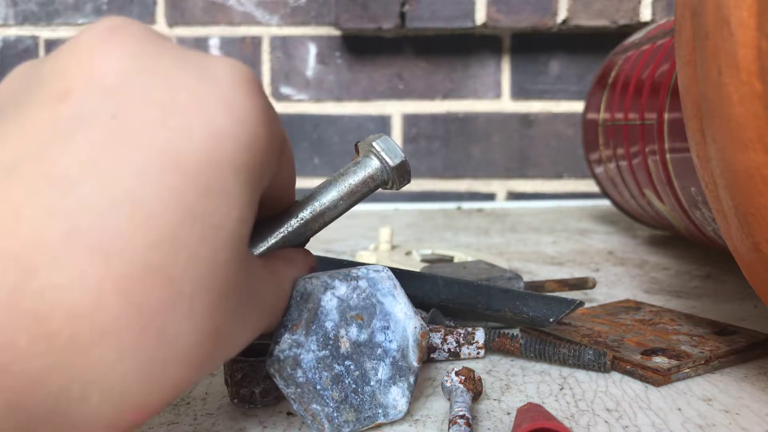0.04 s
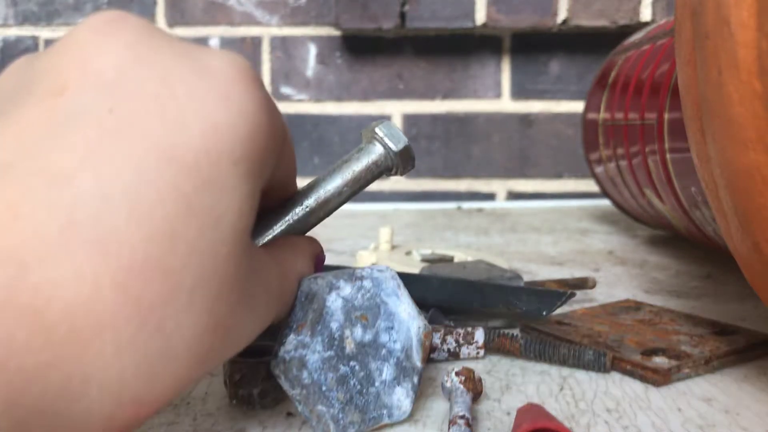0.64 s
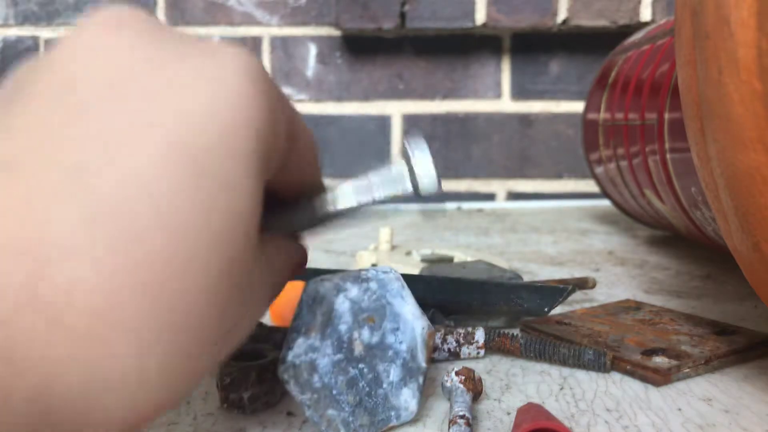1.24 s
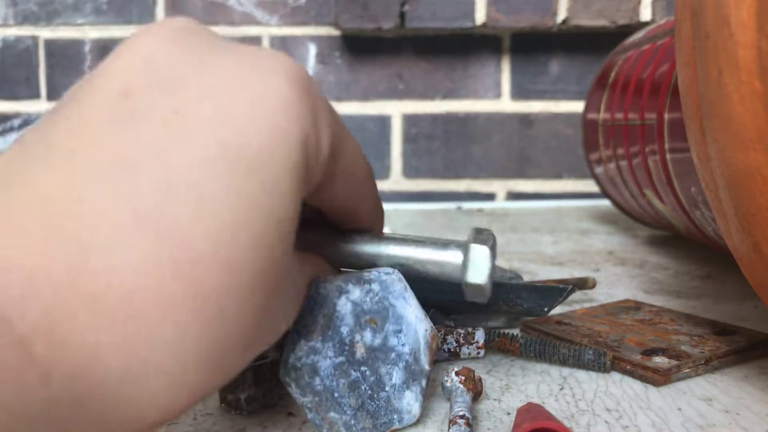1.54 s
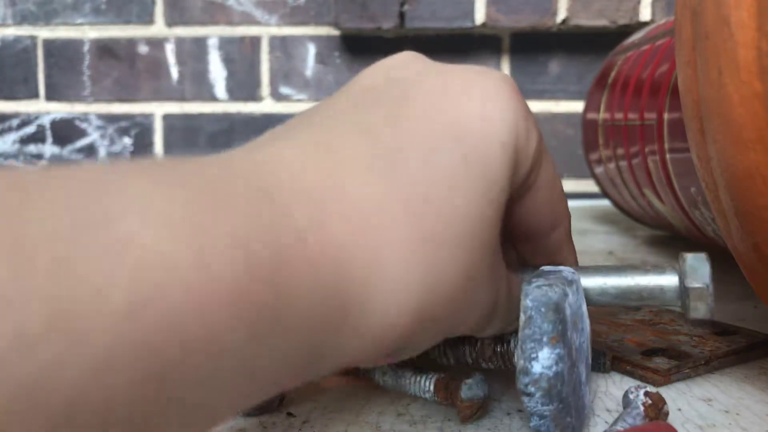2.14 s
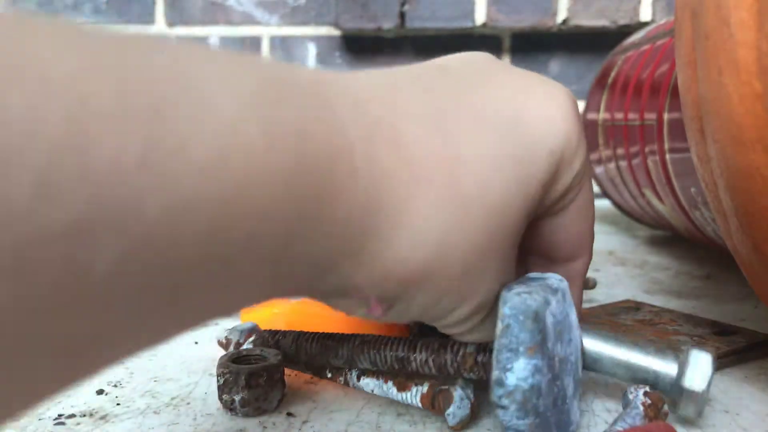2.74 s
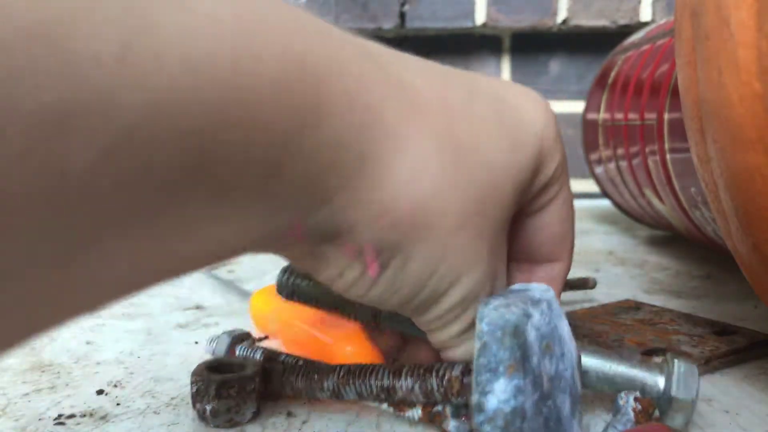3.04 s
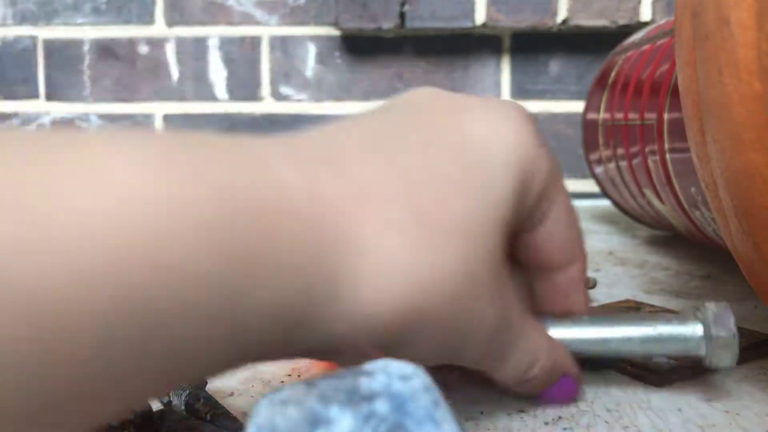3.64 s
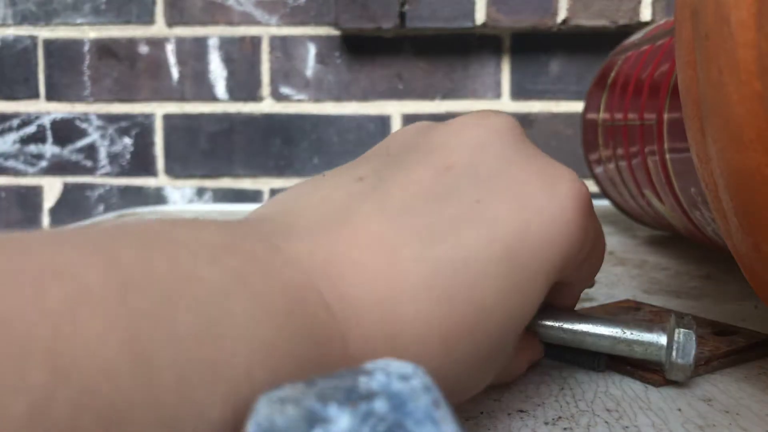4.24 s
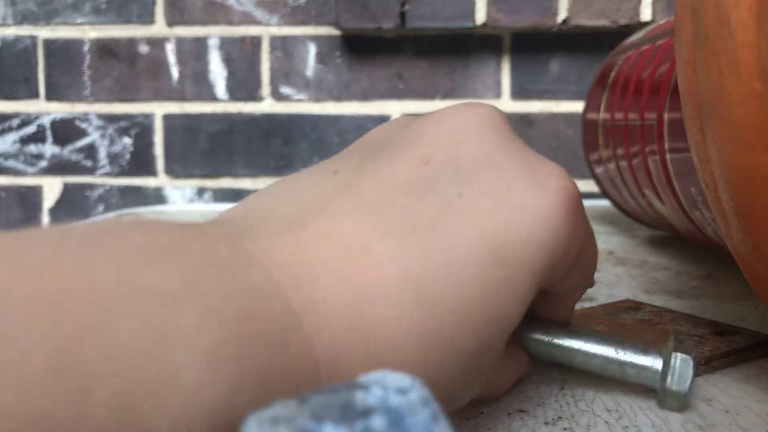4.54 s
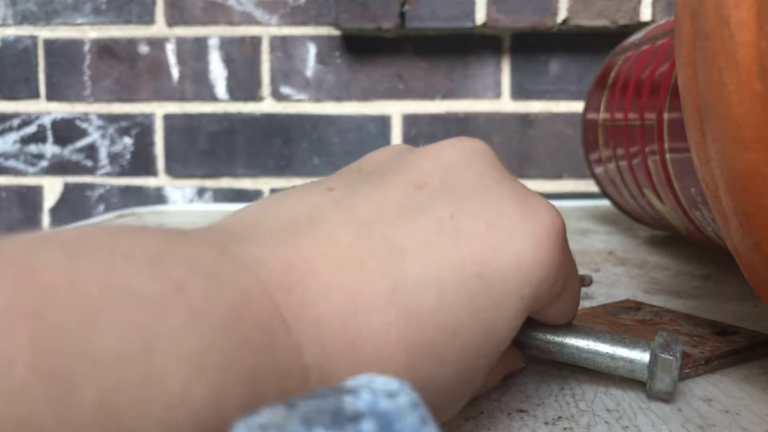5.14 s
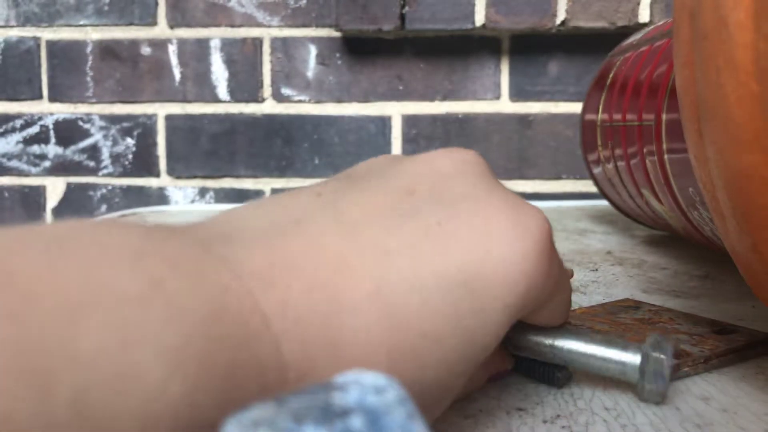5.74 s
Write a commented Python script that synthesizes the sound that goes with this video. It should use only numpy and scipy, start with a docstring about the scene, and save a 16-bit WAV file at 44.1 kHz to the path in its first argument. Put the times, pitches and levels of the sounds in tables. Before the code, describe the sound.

Steel hardware is handled on a board outdoors, very close to the microphone. From 0.3 to 0.7 seconds a piece lands with a clink and bounces in a quick run of hollow clunks. Louder knocks with brief steel rings come between 1.2 and 1.5 seconds. From 1.6 seconds a heavy bolt is dragged over the gritty surface in short, uneven pushes that rumble and rasp, with a thin metallic singing near 1.8. Scraping and scattered knocks continue, with a cluster of clinks from 3.3 to 3.8 seconds. A loud, quickly damped knock lands at 4.5, followed by lighter scrapes and taps and a bright clack at 5.6. Throughout there is soft open air, a faint low machine drone and a far insect chorus, while one nearer insect's very high, thin trill grows slightly.

```python
"""Rusty bolts and nuts clatter on a board, close by and outdoors, as a hand rummages through them.
Each impact excites the board's modes in a hollow clunk, which the hand damps; steel striking steel
rings briefly. A heavy bolt is dragged over the gritty surface, where stick-slip friction drives
the board and keeps sliding pieces singing. Behind it are soft open air, a machine's low drone,
a far chorus of insects and one nearer insect's trill."""
import sys
import numpy as np
from scipy import signal
from scipy.fft import rfft, irfft
from scipy.io import wavfile
from scipy.ndimage import uniform_filter1d

SR = 44100
rng = np.random.default_rng(int(sys.argv[2]) if len(sys.argv) > 2 else 0)


def bounce(signal):
    """Save signal as a 16-bit WAV file at the path given by the first command-line argument."""
    frames = np.transpose(np.atleast_2d(signal))
    limited = np.clip(frames, -1, 1)
    pcm = np.round(limited * 32767).astype(np.int16)
    wavfile.write(sys.argv[1], SR, pcm)


N = 263718
TIME = np.arange(N) / SR
RING_TIME = TIME[:SR // 4]

# spectrum of the open air: (frequency [Hz], relative density [dB])
AIR_SPECTRUM = [(20, -55), (31, -26), (42, -8), (60, -1), (80, -5.5), (139, -6.5), (173, -12), (249, -8),
                (435, -13), (750, -14), (1120, -14.5), (1780, -17.5), (3110, -14), (4940, -28),
                (10000, -31.5), (12000, -42.5), (16000, -40)]
# a machine and a far insect chorus: (centre [Hz], bandwidth [Hz], start level [dB], end level [dB])
DRONE_BANDS = [(53.5, 10.3, -51.5, -64), (2920, 890, -55.5, -60)]
# course of the nearer insect's trill: (time [s], level [dB], pitch [Hz])
TRILL_COURSE = [(0, -70.5, 10840), (1.2, -62.5, 10810), (2.5, -58, 10880), (3.4, -58, 10970),
                (4.3, -62, 10930), (5.3, -57.5, 11000), (5.98, -59.5, 11030)]
# modes of each steel piece, by name: (frequency [Hz], relative level [dB], t60 [s])
STEEL_MODES = { "bolt head": [(5600, -9, 0.023), (5910, -5.5, .055), (5830, -6, 0.03), (6400, -13, .03),
               (7600, -31, 0.2), (12080, -32, .06), (14707, -36, 0.4)], "bolt": [(6010, -1, 0.041),
               (8760, -19, 0.08), (12200, -17, 0.057), (14000, -20, .07)], "nut": [(5950, -18, .05),
               (8629, -14, 0.31), (10350, 0, 0.1), (13940, -20, .2)], "long bolt": [(4320, -1, 0.12),
               (6045, -19, 0.064), (14010, -19, .1)], "washer": [(5440, -10, .04), (5700, -4, 0.023),
               (6050, 2, 0.03), (6300, -6.5, 0.049), (9500, -10, 0.055), (11220, -3, 0.025),
               (13980, -10, .05)], "thread": [(5640, -1, .02), (5850, -3, 0.062), (9000, -11, .025),
               (12100, -9, .06)], "burr": [(14000, 0, .06), (14100, -1, 0.023)], "rim": [(8629, -2, .25),
               (13950, 1, .25)], }
# pieces that sing as they slide: (start [s], end [s], level [dB], piece)
STEEL_SLIDES = [(1.686, 1.905, -50.5, "thread"), (1.758, 1.844, -51, "burr"), (1.847, 2.0, -62, "burr"),
                (3.157, 3.41, -63, "rim")]
# steel striking steel: (time [s], gain [dB], piece)
STEEL_HITS = [(0.3081, -24, "bolt head"), (1.225, -36, "bolt head"), (1.354, -35, "bolt"),
              (1.504, -41.5, "bolt"), (1.692, -29, "bolt"), (3.327, -40, "nut"),
              (3.626, -30.5, "long bolt"), (3.704, -32.5, "washer"), (3.725, -42, "washer"),
              (3.766, -47, "washer"), (4.951, -43, "washer"), (5.171, -57, "washer")]
# resolved modes of the board: (frequency [Hz], relative level [dB], t60 [s])
BOARD_MODES = [(108, -12, 0.27), (123, -8, 0.14), (149.2, -5, 0.37), (186.8, -7, 0.38), (220.8, -8, 0.14),
               (283.9, 0, 0.17), (311.4, 1, 0.23), (340.3, -1, 0.1), (426, -2, 0.096), (502.5, -1.5, 0.12),
               (577.4, -6, 0.07), (617.7, -2.5, 0.21), (686, -3.5, 0.07), (769, -6, 0.087), (901, -5, 0.11),
               (962, -7.5, 0.073), (1027.4, -0.5, 0.075), (1104, -4, 0.043), (1215, -9, 0.055),
               (1302, -7, 0.044), (1373, -10.5, 0.067), (1517, -11, 0.037), (1660, -11, 0.046),
               (1863, -7, 0.036), (1886, -12.5, 0.14), (2054, -11, 0.033), (2430, -22, 0.059),
               (2504, -16, 0.022), (2910, -13, 0.034), (3790, -22.5, 0.064)]
# its dense, overlapping modes: (frequency [Hz], relative density [dB], t60 [s])
DENSE_MODES = [(101, -10.5, 1), (300, 0, 0.22), (720, -5, 0.11), (1210, -5, 0.1), (2020, -11.5, 0.065),
               (3030, -18, 0.075), (5000, -30.5, 0.023), (9100, -40.5, 0.013), (15000, -60, .03)]
# edges of the board's boom, thud, clack and tick registers: (frequency [Hz])
REGISTER_EDGES = [80, 280, 800, 2800, 16000]
# pushes of the bolt along the board:
# (start [s], attack [s], hold [s], release [s], rumble gain [dB], rasp gain [dB], grit gain [dB])
PUSHES = [(1.562, 0.086, 0.035, .05, -35.5, -46.5, -72), (1.666, 0.024, .06, .08, -38, -39.5, -52.5),
          (1.746, 0.066, 0.022, 0.17, -33.5, -34.5, -48), (2.019, 0.053, 0.048, 0.042, -43.5, -69, -60),
          (2.317, 0.035, 0.053, 0.035, -40, -52, -61), (2.442, 0.04, 0.016, 0.077, -25.5, -47, -57),
          (2.67, 0.025, 0.036, 0.085, -43.5, -50, -61), (2.761, 0.046, 0.066, 0.081, -38.5, -43, -60),
          (2.958, 0.076, .1, 0.03, -35.5, -41, -57), (3.121, 0.042, 0.18, 0.13, -30.5, -37.5, -54.5),
          (3.602, 0.036, 0.097, 0.03, -37, -38, -48), (3.737, 0.026, 0.012, 0.097, -34, -42, -55),
          (3.872, 0.062, 0.018, 0.07, -47.5, -49, -74), (3.996, 0.031, 0.012, 0.057, -37, -47, -75),
          (4.086, 0.038, .015, 0.047, -39.5, -51, -75), (4.52, .028, 0.0036, .012, -25, -28, -66),
          (4.562, 0.012, .06, 0.049, -35, -44, -66), (4.905, 0.026, 0.1, 0.045, -51.5, -51, -66),
          (5.13, 0.024, .01, 0.041, -46.5, -63, -74), (5.322, 0.018, 0.013, .04, -46, -37, -70),
          (5.628, 0.024, 0.041, 0.015, -51, -33.5, -52), (5.721, .04, 0.018, 0.087, -42.5, -47, -61),
          (5.806, 0.059, .02, 0.016, -49, -39.5, -67)]
# filters for the low, middle and high parts of the scrape: (frequency [Hz], relative gain [dB])
RUMBLE_FILTER = [(90, -2.5), (150, -0.5), (300, -2.5), (400, 5), (600, 2.5), (800, -8.5), (1200, -24)]
RASP_FILTER = [(500, -12.5), (850, 3), (1400, 2), (2100, 3), (3000, 2.5), (5000, -6.5)]
GRIT_FILTER = [(2500, 3), (4000, -1), (6000, 3.5), (8000, -4), (10000, 0.5), (13000, -7.5), (16000, -9)]
# damping of the board by the hand: (time [s], extra decay [dB/s])
HAND_DAMPING = [(0.3, -12), (1.2, 0), (1.5, 79), (2.1, 60), (3.06, 150), (3.7, 63), (4.55, 354), (5.0, 100),
                (5.6, 120)]
# metal landing on the board:
# (time [s], thud level [dB], clack above thud [dB], tick above clack [dB], favoured pitch [Hz])
IMPACTS = [(0.287, -22, -2, -20, 1670), (0.29, -20, -2, -25, 334), (0.3082, -17.5, 0.5, -22, 990),
           (0.341, -20, -1, -33, 504), (0.372, -29.5, 3.5, -21, 1890), (0.4046, -34, 1.5, -33, 1020),
           (0.451, -24.5, -3, -26, 1040), (0.488, -30, -7.5, -29, 310), (0.545, -22, -0.5, -24, 1250),
           (0.5837, -26.5, -6.5, -28, 550), (0.6049, -22.5, -4.5, -34, 990), (0.663, -22.5, -4, -24, 1700),
           (0.727, -29, -2.5, -32, 1760), (0.955, -39.5, -16, -3, 300), (1.143, -34, -8.5, -18, 330),
           (1.1919, -26.5, -8, -7, 1890), (1.2005, -20.5, 4, -15.5, 1900), (1.226, -14, 1.5, -19, 1310),
           (1.249, -29, 4.5, -20, 1140), (1.3531, -22, -5, -15, 557), (1.504, -18.5, -5, -31, 526),
           (1.793, -33.5, -2, -1, 2500), (1.874, -29, 2.5, -32, 1730), (2.029, -42, 5, -20, 1080),
           (2.069, -34.5, -15, -4, 360), (2.107, -39, 0, -22, 500.5), (2.292, -40, -6, -5, 340),
           (2.358, -44.5, 4, -11, 2060), (2.368, -34.5, -7, 2, 345), (2.466, -28, -19, -18, 400),
           (2.519, -27.5, -3, -37, 1080), (2.825, -32.5, 0.5, -29, 2000), (3.064, -22, 1.5, -25, 1050),
           (3.146, -30.5, -2, -24, 600), (3.327, -26.5, -1, -11.5, 710), (3.521, -33.5, -13, -9, 415),
           (3.631, -28, -3, -15, 430), (3.668, -38, 7, -15, 1140), (3.704, -41.5, 6.5, -8.5, 1350),
           (3.972, -35.5, -12, -18, 440), (4.526, -32.5, -3, -24, 840), (4.5463, -11.5, -2, -23, 443),
           (4.953, -37.5, 0, -16, 1070), (5.007, -43, 3.5, -16, 1110), (5.171, -52, 6, -13, 1580),
           (5.351, -36, 6.5, -14, 1960), (5.5773, -24.5, 5.5, -8, 2030), (5.885, -40.5, 1, -21, 950)]


def from_db(db):
    """Amplitude grows tenfold for every 20 dB."""
    return 10 ** (np.asarray(db) / 20)


def rms_one(x):
    """Division by the RMS value gives unit power."""
    return x / np.sqrt(np.mean(x ** 2) + 1e-20)


def steady(x, size=3000):
    """Division by a running RMS evens out slow changes of level and keeps the grain."""
    return x / np.sqrt(np.abs(uniform_filter1d(x ** 2, size=size)) + 1e-12)


def at_hz(table, hz, column=1):
    """Interpolation on a log-frequency axis reads one column of a spectrum."""
    table = np.array(table)
    return np.interp(np.log(np.maximum(hz, 1)), np.log(table[:, 0]), table[:, column])


def colour(x, spectrum):
    """Filtering multiplies spectra; the result has unit power."""
    gain = from_db(at_hz(spectrum, np.fft.rfftfreq(N, 1 / SR)))
    return rms_one(irfft(rfft(x) * gain, N))


def butterworth(x, hz, kind, order=2):
    """A causal filter with a maximally flat passband."""
    return signal.sosfilt(signal.butter(order, hz, kind, fs=SR, output="sos"), x)


def drift(per_s):
    """Interpolated Gaussian values make a slow random process with a spread near 1."""
    knots = rng.standard_normal(4096)
    return np.interp(TIME * per_s, np.arange(len(knots)), knots)


def add(out, start_s, sound):
    """Superposition: a sound adds to the mix from its start time."""
    start = max(round(start_s * SR), 0)
    out[start:start + len(sound)] += sound[:N - start]


def outdoors(air_db=-48.5):
    """Broadband noise is heard as open air, narrowband noise as a machine and far insects droning."""
    out = from_db(air_db) * colour(rng.standard_normal(N), AIR_SPECTRUM)
    for hz, width, start_db, end_db in DRONE_BANDS:
        drone = butterworth(rng.standard_normal(N + SR), [hz - width / 2, hz + width / 2], "band")
        out += rms_one(drone[SR:]) * np.linspace(from_db(start_db), from_db(end_db), N)
    return out


def insect(width_hz=264, wingbeat_hz=71, depth=0.26):
    """Amplitude modulation: a narrow, high buzz throbs with each wing stroke."""
    times, db, hz = np.transpose(TRILL_COURSE)
    phase = 2 * np.pi * np.cumsum(np.interp(TIME, times, hz)) / SR
    in_phase, quadrature = butterworth(rng.standard_normal((2, N)), width_hz / 2, "low")
    buzz = in_phase * np.cos(phase) + quadrature * np.sin(phase)
    throb = 1 + depth * np.sin(2 * np.pi * wingbeat_hz * TIME + drift(5))
    return from_db(np.interp(TIME, times, db)) * rms_one(throb * buzz)


def steel_ring(piece, spread_db=2.0):
    """Free vibration of struck steel is a sum of damped sines, each of slightly random strength."""
    out = np.zeros(len(RING_TIME))
    for hz, db, t60 in STEEL_MODES[piece]:
        strength = from_db(db + rng.normal(0, spread_db))
        out += strength * np.sin(2 * np.pi * hz * RING_TIME) * from_db(-60 * RING_TIME / t60)
    return out


def singing():
    """Forced vibration: friction noise keeps the modes of a sliding piece ringing."""
    out = np.zeros(N)
    for start, end, db, piece in STEEL_SLIDES:
        friction = rng.standard_normal(SR)
        tone = steady(signal.oaconvolve(friction, steel_ring(piece), mode="valid"), size=1500)
        tone = tone[:round((end - start) * SR)]
        add(out, start, from_db(db) * tone * np.hanning(len(tone)) ** 0.17)
    return out


def clinks():
    """Impacts excite the high modes of small steel parts, soon damped by the hand and the pile."""
    out = np.zeros(N)
    for time, db, piece in STEEL_HITS:
        add(out, time, from_db(db) * steel_ring(piece))
    return out


def mode_envelope(t60, slowness):
    """A mode swells once the bending wave arrives, then decays exponentially; slow waves come later."""
    delay_s, rise_s = 0.00076 * slowness, 0.00037 * slowness
    age = np.maximum(RING_TIME - delay_s, 0)
    return (1 - np.exp(-age / rise_s)) * from_db(-60 * age / t60)


def board_partials(places, dense_db, crack_db):
    """Modal response of a dispersive board, highs first: pitches and waves[partial, place, sample]."""
    pitches, waves = [], []
    for hz, db, t60 in BOARD_MODES:
        slowness = np.sqrt(1000 / hz)  # of a bending wave, relative to 1 kHz
        # the place of the blow sets each mode's sign and strength
        strength = rng.choice([-1, 1], (places, 1)) * from_db(db + rng.normal(0, 2.23, (places, 1)))
        sine = np.sin(2 * np.pi * hz * (RING_TIME - 0.00076 * slowness))
        pitches.append(hz)
        waves.append(np.float32(strength * rms_one(sine * mode_envelope(t60, slowness))))
    # overlapping modes merge into bands of decaying noise
    edges = np.geomspace(REGISTER_EDGES[0], REGISTER_EDGES[-1], 22)
    for low, high in zip(edges, edges[1:]):
        hz = np.sqrt(low * high)
        slowness = np.sqrt(1000 / hz)
        t60 = at_hz(DENSE_MODES, hz, column=2)
        crack = from_db(crack_db) * mode_envelope(0.009 * slowness, slowness)
        tail = from_db(-6) * mode_envelope(2.1 * t60, slowness)  # from the wall and the loose pieces
        noise = butterworth(rng.standard_normal(2 * SR), [low, high], "band")
        wave = np.array([noise[i:i + len(RING_TIME)] for i in rng.integers(SR // 10, SR, places)])
        wave *= crack + mode_envelope(t60, slowness) + tail
        gain = from_db(dense_db + at_hz(DENSE_MODES, hz)) * np.sqrt((high - low) / 100)
        pitches.append(hz)
        waves.append(np.float32(gain * wave / wave.std(axis=1, keepdims=True)))
    return np.array(pitches), np.array(waves)


def grains(per_s=1100, spread_db=4.0, judder_db=3.5, judders_per_s=110):
    """Stick-slip: rust and sand catch and let go in uneven clumps of tiny impulses."""
    sizes = from_db(spread_db * np.minimum(rng.exponential(1, N), 4)) * rng.choice([-1, 1], N)
    caught = rng.random(N) < per_s / SR
    return sizes * caught * from_db(judder_db * drift(judders_per_s))


def sliding_contact(catches, places=7, dwell_s=0.035):
    """The impulse response depends on the driving point, so a wandering contact shifts the timbre."""
    _, waves = board_partials(places, dense_db=3.5, crack_db=20.0)
    place = rng.integers(0, places, 2048)[(TIME / dwell_s).astype(int)]
    return sum(signal.oaconvolve(catches * (place == k), response)[:N]
               for k, response in enumerate(waves.sum(axis=0)))


def push_pressure(start, attack, hold, release, swing_db=17):
    """Contact pressure acts as a gain on friction noise: it builds, holds and lets go."""
    rise = np.minimum(TIME - start - attack, 0) / attack
    fall = np.maximum(TIME - start - attack - hold, 0) / release
    return from_db(np.maximum(swing_db * (rise - fall), -120))


def dragging(wobble_db=1.5, wobbles_per_s=30):
    """Sliding friction drives the board into a rumble and a rasp, and hisses at the gritty contact."""
    pressure = np.array([push_pressure(*push[:4]) for push in PUSHES])
    wobble = from_db(wobble_db * drift(wobbles_per_s))  # the hand pushes unevenly
    rumble_gain, rasp_gain, grit_gain = from_db([push[4:] for push in PUSHES]).T @ pressure * wobble
    catches = grains()
    board = sliding_contact(catches)
    contact = rms_one(catches) + 0.98 * rng.standard_normal(N)
    rumble = rumble_gain * steady(colour(board, RUMBLE_FILTER), size=1200)
    rasp = from_db(-2) * rasp_gain * steady(colour(board, RASP_FILTER), size=1400)
    grit = grit_gain * steady(colour(contact, GRIT_FILTER))
    return rumble + rasp + grit


def landings(heavy_db=-21.5, rebound_s=0.0073, loss_db=9.5):
    """Inelastic collision: every piece lands, and a heavy one rocks and lands again more softly."""
    gaps = rebound_s * rng.uniform(0.8, 1.2, len(IMPACTS))
    rebounds = [(time + gap, db - loss_db, *timbre)
                for (time, db, *timbre), gap in zip(IMPACTS, gaps) if db > heavy_db]
    return IMPACTS + rebounds


def boom_level(thud_db, grip, favoured_hz, ceiling_db=-28.5, small_hz=700, loss_db_per_octave=4.5):
    """Low modes follow the blow up to a ceiling; the hand mutes them, small pieces excite them less."""
    octaves_above = max(np.log2(favoured_hz / small_hz), 0)
    return min(thud_db - 4.5, ceiling_db) - 0.038 * grip - loss_db_per_octave * octaves_above


def knocks(favour_db=6.0, favour_octaves=0.18):
    """Impulse excitation: each blow rings the board in four registers, and the hand damps the ring."""
    blows = landings()
    pitches, waves = board_partials(len(blows), dense_db=-2.5, crack_db=16.5)
    register = np.digitize(pitches, REGISTER_EDGES[1:-1])
    out = np.zeros(N)
    for i, (time, thud_db, hardness_db, edge_db, favoured_hz) in enumerate(blows):
        grip = np.interp(time, *np.transpose(HAND_DAMPING))
        damping = from_db(-grip * RING_TIME)
        emphasis = from_db(favour_db * np.exp(-(np.log2(pitches / favoured_hz) / favour_octaves) ** 2))
        clack_db = thud_db + hardness_db
        levels = [boom_level(thud_db, grip, favoured_hz), thud_db, clack_db, clack_db + edge_db]
        for k, db in enumerate(levels):
            ring = damping * (emphasis[register == k] @ waves[register == k, i])
            # keep each register's energy out of the one below
            ring = butterworth(ring + 1e-18, 0.9 * REGISTER_EDGES[k], "high")
            peak_rms = np.sqrt(uniform_filter1d(ring ** 2, size=353, mode="constant").max())  # over 8 ms
            add(out, time, from_db(db) * ring / peak_rms)
    return out


def scene():
    """The pressures of all sources superpose at one close microphone."""
    return (knocks() + clinks() + dragging() + singing() + outdoors() + insect())[None]


def record(dry, bass_hz=40, cutoff_hz=16000):
    """Band limiting: the small microphone loses the deepest bass, and the top is cut steeply."""
    thin = butterworth(dry, bass_hz, "high", order=4)
    return signal.sosfilt(signal.ellip(10, 0.2, 80, cutoff_hz, fs=SR, output="sos"), thin)


dry = scene()
out = record(dry)
bounce(out)
```